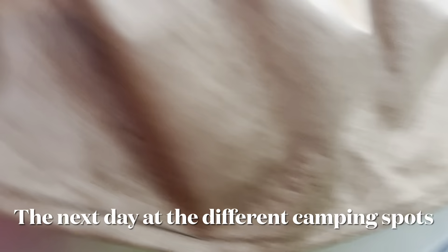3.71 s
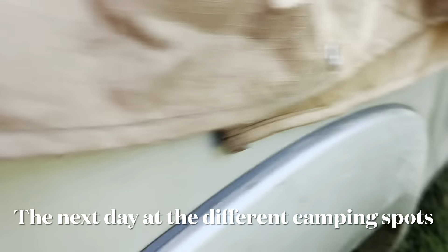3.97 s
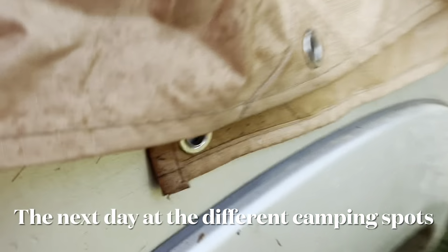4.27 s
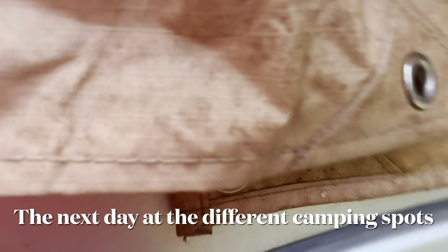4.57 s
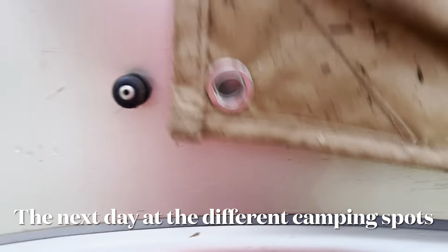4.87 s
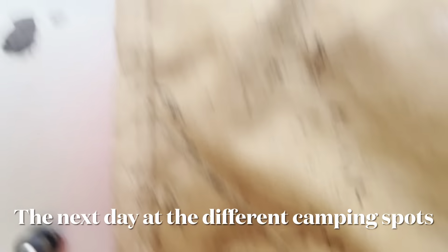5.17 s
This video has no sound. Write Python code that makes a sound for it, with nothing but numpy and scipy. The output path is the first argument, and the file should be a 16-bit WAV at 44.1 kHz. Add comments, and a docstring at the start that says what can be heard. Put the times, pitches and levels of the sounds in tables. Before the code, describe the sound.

Outdoors in quiet air, stiff canvas is handled very close to the microphone. Faint rustles and small bumps come first, followed by a single loud knock with a short, hollow rattle from a vehicle's body. The tarp then slides and bunches in repeated tugs, with scraping, dry crackles and low, billowing flaps. The last pulls are the loudest and busiest.

```python
"""Heavy canvas flaps and rustles right at the microphone: a tarp pulled back off a vehicle, outdoors.
The hollow body takes a few light bumps and one sharp, rattling knock. Then the cloth is dragged in
several pulls: its weave hisses and rasps as threads catch and slip, folds buckle and snap, and the
slack sheet pushes air in low flaps. Quiet open air lies underneath."""
import sys
import numpy as np
from scipy import signal
from scipy.fft import rfft, irfft
from scipy.io import wavfile
from scipy.ndimage import map_coordinates

SR = 44100
rng = np.random.default_rng(int(sys.argv[2]) if len(sys.argv) > 2 else 0)


def to_wav(s):
    """Save 16-bit WAV."""
    ch = np.atleast_2d(s).T  # columns
    pcm = np.round(np.clip(ch, -1, 1) * 32767)  # PCM
    wavfile.write(sys.argv[1], SR, pcm.astype(np.int16))


N = 235213
T = np.arange(N) / SR
FREQS = np.fft.rfftfreq(2 ** 18, 1 / SR)
PATHS = 3  # one direct path, then a scattered path to each of the two microphone ports


def cloth():
    """Threads catch and slip, small folds buckle and the sheet billows, all with one uneven drag."""
    # Cloth slides over cloth. Each row: time of full speed, rise, hold and fall in seconds,
    # then hiss and fine weave treble in dB.
    slides = [(0.0, .02, 0.0036, 0.042, -55.5, -57.5), (0.18, 0.0063, 0.004, 0.018, -58, -64),
              (0.21, 0.008, 0.004, 0.017, -61, -60), (0.19, 0.052, 0.042, .07, -59, -77),
              (0.30, 0.039, 0.041, 0.038, -58.5, -79), (0.44, 0.024, 0.021, 0.089, -57, -65.5),
              (0.463, .005, .003, 0.014, -54, -70), (0.602, 0.0099, 0.03, 0.025, -66, -65),
              (1.0, 0.25, 0.18, 0.17, -61, -99), (1.27, 0.2, 0.18, 0.14, -61.5, -66),
              (1.78, 0.017, 0.0058, 0.031, -66, -55), (1.90, 0.18, 0.087, 0.2, -54.5, -60.5),
              (2.13, 0.091, 0.0056, 0.045, -44.5, -50), (2.208, 0.025, 0.08, 0.17, -40.5, -39.5),
              (2.40, 0.075, 0.092, 0.17, -51, -78), (2.69, 0.15, 0.0093, 0.18, -39, -46),
              (2.79, 0.096, 0.064, 0.1, -48.5, -53), (2.912, 0.032, .008, 0.027, -46, -77),
              (3.15, 0.026, 0.075, 0.04, -47.5, -53.5), (3.253, 0.011, 0.011, 0.045, -41, -45),
              (3.29, 0.03, 0.022, 0.067, -37, -41.5), (3.42, .14, 0.038, 0.065, -41.5, -46),
              (3.475, 0.056, 0.03, 0.16, -37.5, -41), (3.59, 0.1025, 0.063, 0.074, -44.5, -48.5),
              (3.675, 0.038, .11, 0.09, -41.5, -38.5), (3.85, 0.17, 0.11, 0.4, -35.5, -41),
              (4.09, 0.12, 0.051, 0.11, -49, -58), (4.24, 0.078, 0.097, 0.087, -44, -44.5),
              (4.489, 0.015, 0.016, 0.15, -39, -43.5), (4.59, 0.045, 0.048, .1, -47.5, -51.5),
              (4.68, 0.022, 0.017, .04, -39, -45.5), (4.73, 0.033, 0.054, 0.26, -36, -38.5),
              (4.92, 0.12, 0.065, 0.24, -39.5, -41.5), (5.205, 0.06, 0.011, 0.21, -47.5, -45)]
    # Cloth bunches up. Each row: time it is fullest, rise, hold and fall in seconds,
    # then crumpling and billowing in dB.
    bunches = [(0.0, .02, 0.0052, 0.078, -53.5, -40.5), (0.125, 0.056, 0.039, 0.14, -58.5, -46),
               (0.26, 0.12, 0.09, 0.08, -53, -58), (0.52, 0.15, 0.0067, 0.088, -51.5, -52),
               (0.73, 0.036, 0.19, 0.13, -61, -54), (1.03, 0.05, 0.017, 0.078, -56.5, -54),
               (1.215, 0.038, 0.023, 0.032, -55, -75), (1.45, 0.019, 0.0042, 0.016, -52, -39.5),
               (1.93, 0.49, 0.29, 0.44, -46, -38), (2.43, 0.05, 0.23, 0.39, -46.5, -45.5),
               (2.69, 0.25, 0.027, 0.32, -41, -37), (3.05, 0.1, 0.12, 0.084, -58.5, -68),
               (3.21, 0.11, 0.059, 0.35, -45.5, -38.5), (3.45, 0.075, 0.3, 0.15, -43.5, -41.5),
               (3.81, 0.37, 0.1, 0.076, -39.5, -39.5), (3.91, 0.088, 0.081, 0.22, -31, -28.5),
               (4.10, 0.077, 0.043, 0.19, -33.5, -42), (4.23, 0.039, 0.041, 0.22, -38.5, -37.5),
               (4.495, 0.021, 0.0056, 0.13, -51, -30.5), (4.70, 0.09, 0.2, 0.12, -37, -33),
               (4.94, 0.18, 0.047, 0.15, -31, -28), (5.015, 0.049, 0.0084, 0.089, -28, -31.5),
               (5.12, 0.12, 0.011, 0.14, -37, -33.5), (5.27, 0.11, 0.011, 0.15, -41.5, -41.5)]
    # The tone of each layer. Each row: frequency in Hz, level in dB.
    hiss_tone = [(200, -10), (700, 1), (1500, 5.5), (2300, 3.5), (3400, 1.5), (4600, 2.5), (6000, -7),
                 (8000, -25), (15000, -18)]
    weave_tone = [(2000, -7.5), (5000, -0.5), (7500, 2.5), (10500, 3.5), (13000, -1), (15500, -2)]
    crumple_tone = [(60, -28.5), (200, 4), (380, 4.5), (600, 1), (830, -4), (1100, 0.5), (1450, 0),
                    (2100, -10.5), (3200, -21), (6000, -20.5), (15000, -23.5)]
    billow_tone = [(20, -32), (35, -6), (55, 2), (85, 1), (140, -3), (240, -7.5), (400, -14), (800, -24),
                   (3000, -64)]
    hiss_db, weave_db = move_levels(slides, fades_db=[19.5, 20])
    crumple_db, billow_db = move_levels(bunches, fades_db=[20, 22.5])
    jerk = walk(55) + 0.24 * walk(210)
    hiss = shifting_folds(colour(grains(6000, 0.84), hiss_tone), depth_db=1.5, rate=9)
    hiss *= amp(hiss_db + 2.5 + jerk)
    weave = shifting_folds(colour(grains(16000, 3.2), weave_tone), depth_db=-0.66, rate=11)
    weave *= amp(weave_db + 5 + 1.3 * jerk)
    crumple = shifting_folds(colour(grains(1300, 1.9), crumple_tone), depth_db=2.5, rate=30)
    crumple *= amp(crumple_db + 1 + 1.5 * jerk)
    crinkles = creases() * amp(crumple_db - 7)
    grit = unit(band(grains(220, 2.2), 1100, 5500)) * amp(hiss_db - 9.5)
    billow = unit(colour(grains(900, 1.3), billow_tone)) * amp(billow_db + 0.5 + jerk)
    rustle = hiss + weave + crumple
    # narrow pockets between the folds colour the whole rustle for a moment each
    rustle = rustle.std() * shifting_folds(rustle, depth_db=2.2, rate=16, per_octave=14)
    return ports(rustle + crinkles + grit + billow, scatter=0.74)


def move_levels(moves, fades_db, braking=1.18):
    """Two dB envelopes: moves swell, hold and die away, losing fades_db over one rise or fall time."""
    power = np.full((2, N), 1e-12)
    for s, rise, hold, fall, *db in moves:
        away = np.maximum(s - T, 0) / rise + np.maximum(T - s - hold, 0) / fall
        near = away < 3
        lost_db = np.outer(fades_db, away[near] ** braking)  # ever faster as friction stops the move
        power[:, near] += amp(np.array(db)[:, None] - lost_db) ** 2
    return 10 * np.log10(power)


def grains(rate, spread_db):
    """Random clicks, rate a second, mostly small and a few large."""
    chance, size = rng.random(N), np.minimum(rng.exponential(size=N), 4)
    return (chance < rate / SR) * rng.choice([-1, 1], (PATHS, N)) * amp(spread_db * size)


def shifting_folds(x, depth_db, rate, per_octave=2.518):
    """Folds open and close, so the cloth's resonances come and go, rate times a second."""
    hz, s, spectra = signal.stft(x, SR, nperseg=512)
    place = np.meshgrid(np.log2(1 + hz / 100) * per_octave, s * rate, indexing="ij")
    drift = map_coordinates(rng.standard_normal(size=(128, 512)), place, order=3, mode="wrap")
    return unit(signal.istft(spectra * amp(depth_db * drift), SR)[1][:, :N])


def creases(centre_hz=2100, octaves=0.6, range_db=13, count=900):
    """Small creases flip at random, each a dry tick with its own falling pitch."""
    out = np.zeros((PATHS, N))
    for when, pitch, size in zip(rng.random(count), rng.standard_normal(count), rng.random(count)):
        hz = min(centre_hz * 2 ** (octaves * pitch), SR / 4)
        add(out, when * N / SR, amp(range_db * size ** 2) * pop(hz, cycles=1.2, sag=0.16))
    return unit(out)


def rasps(roughness_hz=230, wobble=0.025):
    """The ribs of the weave rub past each other: a short rough zip, gliding up or down in pitch."""
    # Taut cloth rubs itself. Each row: start and length in seconds, first and last pitch in Hz,
    # level in dB.
    zips = [(0.191, .17, 820, 957, -52), (0.472, 0.151, 950, 856, -53.5), (2.201, 0.12, 2500, 2300, -49),
            (2.591, .2, 2210, 2500, -47), (3.402, 0.052, 2090, 2990, -42), (3.462, 0.1, 1550, 2840, -39),
            (3.479, .045, 4100, 4760, -39), (3.848, 0.032, 3400, 4480, -36.5),
            (4.511, .15, 1744, 2200, -45.5), (4.659, .13, 1820, 2415, -37.5),
            (4.736, .12, 2570, 2820, -38.5), (5.017, .045, 2310, 1796, -36)]
    out, t = np.zeros((PATHS, N)), T[:SR // 4]
    unsteady = 1 + wobble * walk(60)
    for s, length, start_hz, end_hz, db in zips:
        along = np.minimum(t / length, 1)
        pitch = (start_hz + (end_hz - start_hz) * along) * unsteady[int(s * SR):][:len(t)]
        tone = np.sin(2 * np.pi * np.cumsum(pitch) / SR)
        roughness = unit(band(rng.standard_normal((PATHS, len(t))), 6.7, roughness_hz))
        add(out, s, amp(db) * np.sin(np.pi * along) * unit(roughness * tone))
    return ports(out, scatter=0.61)


def snaps(pop_db=-2.5, rasp_db=-6, crackle_db=9):
    """A taut fold pops through with a falling chirp; the sheet around it thuds and its fibres crackle."""
    # Folds that snap. Each row: start in seconds, level in dB, starting pitch in Hz, pitch sag as a
    # share per cycle, fibre crackle in dB, decay in seconds, thud in dB.
    folds = [(0.291, -42, 1010, 0.046, -51, 0.0074, -55), (0.725, -35.5, 970, .017, -65, 0.014, -52),
             (0.828, -41, 1120, .2, -72, 0.0019, -46), (1.277, -37.5, 3640, .009, -57, .0028, -53),
             (1.922, -25.5, 2480, 0.054, -55, 0.0034, -38), (1.974, -26.5, 2270, 0.11, -42, 0.0066, -26.5),
             (1.998, -30, 895, .36, -55, 0.0022, -25), (2.033, -30, 1100, 0.21, -61, 0.0026, -32),
             (2.040, -39, 700, 0.33, -62, 0.0023, -34), (2.056, -33, 1200, 0.078, -61, 0.002, -35),
             (2.179, -31, 695, 0.35, -58, 0.0059, -34), (2.210, -22, 2580, 0.1, -29, 0.0044, -27),
             (2.283, -17.5, 2410, 0.0052, -31.5, 0.0081, -42), (2.437, -30, 1510, 0.019, -60, .004, -35),
             (2.510, -34, 1310, 0.2, -51, 0.0022, -32), (2.538, -33, 1510, 0.23, -39.5, 0.0023, -34),
             (3.200, -29, 1150, .15, -51, 0.0039, -32), (3.223, -20.5, 1530, 0.34, -46, 0.0041, -22.5),
             (3.268, -35, 2240, 0.016, -40, .0041, -44), (3.281, -24, 2480, .007, -35, 0.0016, -36),
             (3.4318, -16.5, 1100, .01, -47, 0.0026, -40), (3.449, -27, 1300, .04, -46, 0.0021, -42),
             (3.477, -28, 1200, .013, -44, .004, -40), (3.6099, -14, 2500, .22, -49, 0.004, -20.5),
             (3.739, -14, 2210, 0.04, -22.5, 0.0016, -32), (3.787, -25, 1000, .01, -48, .003, -28),
             (3.813, -20, 1040, 0.095, -31.5, 0.0033, -29), (3.916, -25, 1800, 0.35, -42, .002, -17.5),
             (3.947, -17, 1280, 0.13, -45, 0.0026, -20), (3.955, -20, 1400, .05, -44, 0.0024, -24),
             (3.972, -16, 1110, 0.1, -46, 0.0035, -15), (3.993, -24, 1720, 0.072, -37, .0018, -26),
             (4.001, -23, 1600, 0.13, -33, .002, -25), (4.043, -21, 1200, 0.32, -44, 0.0023, -18.5),
             (4.075, -16, 1500, 0.3, -23.5, 0.0024, -26), (4.107, -18, 2310, 0.57, -50, 0.0026, -26),
             (4.126, -29, 1270, 0.017, -54, 0.0034, -36), (4.153, -27, 2390, .01, -38, .0015, -36),
             (4.189, -23.5, 1495, .005, -49, 0.0034, -44), (4.5075, -12.5, 2210, 0.34, -48, 0.0041, -15),
             (4.725, -36, 1890, 0.37, -33, 0.0036, -22), (4.799, -16, 1520, 0.15, -45, .003, -21),
             (4.825, -22, 2265, .052, -47, 0.0022, -20), (4.8898, -24, 1112, 0.16, -52, 0.008, -15.5),
             (4.901, -20, 1300, 0.045, -31.5, 0.0033, -27), (4.920, -17, 1600, 0.22, -42, .002, -25),
             (4.936, -17.5, 2100, 0.12, -40, 0.004, -19.5), (4.941, -22, 2470, 0.034, -45, 0.0041, -29),
             (4.951, -20, 1300, 0.23, -43, .002, -19), (4.966, -24, 1900, 0.1, -45, 0.0022, -31),
             (4.974, -33, 990, 0.42, -46, 0.0018, -24), (5.0042, -21, 1250, 0.025, -56, .0043, -31),
             (5.01, -25, 1500, 0.16, -46, 0.0022, -22), (5.016, -14, 1860, 0.089, -51, 0.0027, -16),
             (5.0234, -13, 2000, 0.17, -46, .0018, -18.5), (5.039, -16.5, 1520, 0.064, -50, 0.0024, -23),
             (5.112, -14, 1730, 0.11, -46, 0.0029, -21)]
    out = np.zeros((PATHS, N))
    for s, db, hz, sag, fibre_db, decay, thud_db in folds:
        chirp = amp(db + pop_db) * pop(hz, min(hz * decay, 10), sag)
        rasp = amp(db + rasp_db) * burst(hz * 0.48, hz + 1500, decay)
        thud = amp(thud_db) * burst(143, 520, decay=0.0036)
        crackle = amp(fibre_db + crackle_db) * burst(1830, 4420, decay * 1.17)
        add(out, s, chirp + rasp + thud + crackle)
    return ports(out, scatter=0.99, pan_db=0.5)


def pop(hz, cycles, sag=0.):
    """A patch of cloth or panel jumps to a new shape and swings briefly; sag slows it as it slackens."""
    age = T[:SR // 25] * hz
    turns = np.cumsum(hz / (1 + sag * age)) / SR
    phase = rng.uniform(0, 2 * np.pi, (PATHS, 1))
    phase[0] = 0  # only the scattered paths start at random
    swing = np.sin(2 * np.pi * turns + phase) * np.exp(-age / cycles) * (1 - np.exp(-2 * np.pi * age))
    return swing / abs(swing[0]).max()


def burst(lo_hz, hi_hz, decay):
    """A dying burst of noise in one band, with a peak of 1."""
    t = T[:SR // 25]
    noise = band(rng.standard_normal((PATHS, len(t))) * np.exp(-t / decay), lo_hz, hi_hz)
    return noise / abs(noise).max(axis=1, keepdims=True)


def flaps(sag=0.089):
    """The sheet pushes air for a few cycles; its pitch sags as it goes slack."""
    # Each row: start in seconds, level in dB, pitch at the peak in Hz, swings until the peak.
    sheet_flaps = [(0.0, -25, 48.6, 0.9), (0.04, -34, 46.3, 1.36), (0.114, -41, 99, 4),
                   (0.828, -33.5, 77.6, 0.86), (0.898, -38.5, 70.7, 1.15), (1.446, -45, 111, 1.8),
                   (1.876, -32, 124, 1.1), (1.962, -24, 86.3, 1.37), (2.062, -19.5, 129, 1.3),
                   (2.205, -24, 85.4, 1.4), (2.214, -24.5, 221, 0.9), (2.555, -25, 64, 1.07),
                   (2.693, -26.5, 60.3, 1.6), (3.226, -28.5, 85, 0.73), (4.037, -22.5, 146, 0.75),
                   (4.239, -28, 61, 1.4), (4.494, -25.5, 70, 1.06)]
    out, t = np.zeros((PATHS, N)), T[:SR // 4]
    for s, db, hz, swell in sheet_flaps:
        age = t * hz / swell
        turns = np.cumsum(hz * (1 + sag * (1 - np.minimum(age, 3)))) / SR
        envelope = (age * np.exp(1 - age)) ** 2
        add(out[0], s, amp(db) * envelope * np.sin(2 * np.pi * turns))
    return ports(out, scatter=0.94)


def knocks():
    """Each blow flexes the struck spot and rings the hollow body; a longer contact makes it duller."""
    # Each row: start in seconds, strength in dB, contact time in seconds, pitch of the struck spot
    # in Hz, its flexing in dB relative to the blow, its decay in cycles.
    blows = [(0.309, -23.5, 0.0039, 238, -13, 5.4), (0.520, -25, 0.0036, 282, -10, 6),
             (0.83, -40, 0.0011, 552, 7, 5.6), (1.5236, 1.5, 0.00042, 572, -4.5, 3.7),
             (1.5405, -9, 0.00048, 183, -0.5, 0.28), (1.561, -13, 0.0023, 660, -1, 2.5),
             (1.578, -14, 0.0041, 690, 0, 7.9), (5.131, -28, 0.003, 351, 9, 3.8)]
    # How the body's sound meets the ports. Each row: frequency in Hz, left port's lead in radians.
    body_phase = [(0, 0), (1550, 3.5), (2070, -0.5), (2840, 1.7), (4650, -0.0), (5430, 2.7), (5770, 5.5),
                  (6550, 4.9), (7750, 3.5), (9470, 2.4), (11000, 0.3), (13000, -0.3), (13500, -1.7),
                  (15200, -3.3)]
    out, response = np.zeros((PATHS, N)), hollow_body()
    for s, db, contact, hz, flex_db, cycles in blows:
        softness = np.exp(-2 * np.pi / (contact * SR))
        add(out, s, amp(db) * signal.lfilter([1 - softness], [1, -softness], response))
        add(out, s, amp(db + flex_db) * pop(hz, cycles))
    return ports(out, scatter=1, phase=body_phase)


def hollow_body(modes_db=-16, clatter_db=-21, crack_db=-4, crack_s=0.0041, spread_s=0.005):
    """One hard blow cracks, then spreads through the body as ringing modes and a dense clatter."""
    # Ringing modes, then clatter bands. Each row: frequency in Hz, level in dB, seconds to fall 60 dB.
    body_modes = [(74.7, -12.2, 1.16), (94.9, -14.2, 0.94), (109.7, -10.3, 0.82), (146.0, -12.7, 0.64),
                  (179.0, -7, 0.48), (194.5, -3.5, 0.45), (212.6, 0.0, 0.47), (238.9, -5.5, 0.46),
                  (276.6, -3.6, 0.44), (312.2, -4, 0.43), (338.5, -12.8, 0.42), (350.6, -12.9, 0.42),
                  (391.0, -11.7, 0.41), (407.1, -5.5, 0.4), (437.4, -9.2, 0.39), (479.8, -7.9, 0.39),
                  (500.6, -5.9, 0.38), (562.6, -2.0, 0.37), (604.9, -7.5, 0.36), (625.1, -5.7, 0.36),
                  (647.3, -11.2, 0.36), (662.8, -2.9, 0.36), (732.1, -9.7, 0.35), (802.8, -14, 0.34)]
    clatter_bands = [(44.6, -19, 0.95), (110, -14.5, 0.93), (210, -6, 0.77), (400, -11.5, 0.79),
                     (684, -4, 0.41), (1200, -10.5, 0.38), (2340, -14, 0.33), (3740, -13.5, 0.29),
                     (6470, -16.5, 0.26), (12000, -12.5, 0.19)]
    # The tone of the impact. Each row: frequency in Hz, level in dB.
    crack_tone = [(100, -27), (350, -5.5), (570, 11.5), (900, -11.5), (1400, -19), (2100, -14), (4000, -17),
                  (6000, -20.5), (11000, -14), (16000, -26)]
    t, attack = T[:SR], slice(SR // 20)
    phases = rng.uniform(0, 2 * np.pi, (len(body_modes), PATHS, 1))
    phases[:, 0] = 0
    modes, clatter = np.zeros((2, PATHS, SR))
    for k, (hz, db, t60) in enumerate(body_modes):
        modes += (-1) ** k * amp(db - 60 * t / t60) * np.sin(2 * np.pi * hz * t + phases[k])
    for hz, db, t60 in clatter_bands:
        noise = band(rng.standard_normal((PATHS, SR)), hz / 1.43, hz * 1.34, order=3)
        clatter += amp(db - 60 * t / t60) * unit(noise)
    impact = rng.standard_normal((PATHS, SR)) * np.sqrt(t) * np.exp(-t / crack_s)
    crack = colour(impact, crack_tone)[:, :SR]
    ring = amp(modes_db) * modes / modes[:, attack].std()
    ring += amp(clatter_db) * clatter / clatter[:, attack].std()
    response = ring * (1 - np.exp(-t / spread_s)) + amp(crack_db) * crack / abs(crack).max()
    # high bending waves arrive first: a short falling chirp
    add(response, 0, amp(-17) * pop(4500, cycles=18, sag=0.075))
    return response


def outdoors(level_db=-58.5):
    """Quiet open air, gently swelling and sinking."""
    # The tone of the air. Each row: frequency in Hz, level in dB.
    air_tone = [(20, -21), (55, -1.5), (120, -12), (250, -9.5), (600, -8.5), (1500, -17), (4000, -19),
                (8000, -28), (15000, -31)]
    air = unit(colour(rng.standard_normal((PATHS, N)), air_tone))
    return ports(air * amp(level_db + walk(3.83)), scatter=0.98)


def ports(x, scatter, pan_db=0., phase=None):
    """Two microphone ports hear the direct sound out of step, and each its own scattered sound."""
    # Each row: frequency in Hz, left port's lead in radians.
    port_phase = [(0, 0), (1120, 1.7), (1550, 2.8), (2070, -0.3), (2930, 1.0), (4820, 0.3), (5510, -0.9),
                  (6980, -1.5), (7670, -2.9), (8870, -3.4), (11100, -6.0), (13000, -6.7), (14600, -9.0),
                  (15200, -9.5)]
    # Each row: frequency in Hz, scattered share of the power from 0 to 1.
    scattered_share = [(60, 0.078), (300, 0.12), (650, 0.17), (1200, 0.93), (2300, 0.18), (3400, 1),
                       (5400, 0.78), (7200, 0.015), (8300, 0.0014), (9700, 0.067), (11800, 0.031),
                       (14000, 0.03)]
    # Each row: frequency in Hz, left minus right in dB.
    port_balance = [(60, 1.6), (200, 1.5), (600, 4), (1200, 0.5), (2300, 1.5), (4400, 1.5), (7500, 7),
                    (15000, -1.5)]
    share = np.clip(across(scattered_share) * scatter, 0, 1)
    sides = np.array([[1], [-1]])
    balance = amp(sides * (across(port_balance) + pan_db) / 2)
    lead = np.interp(FREQS, *np.transpose(port_phase if phase is None else phase))
    direct = filtered(x[0], balance * np.sqrt(1 - share) * np.exp(.5j * sides * lead))
    return direct + filtered(x[1:], balance * np.sqrt(share))


def amp(db):
    """Decibels to gain."""
    return 10 ** (np.asarray(db) / 20)


def across(points):
    """(Hz, value) points joined on a log-frequency axis."""
    hz, value = np.transpose(points)
    return np.interp(np.log(FREQS + 1), np.log(hz), value)


def filtered(x, response):
    """Apply a frequency response."""
    return irfft(rfft(x, 2 * len(FREQS) - 2) * response)[..., :N]


def colour(x, points):
    """Minimum-phase EQ through the given (Hz, dB) points."""
    cepstrum = irfft(np.log(amp(across(points))))
    cepstrum[1:len(FREQS) - 1] *= 2
    cepstrum[len(FREQS):] = 0
    return filtered(x, np.exp(rfft(cepstrum)))


def band(x, lo_hz, hi_hz, order=2):
    """Butterworth band-pass."""
    edges = [lo_hz, min(hi_hz, SR / 2 - 1)]
    return signal.sosfilt(signal.butter(order, edges, "band", fs=SR, output="sos"), x)


def unit(x):
    """Scale to rms 1."""
    return x / np.sqrt(np.mean(x ** 2))


def add(track, s, sound):
    """Mix a sound in at s seconds."""
    start = max(int(s * SR), 0)
    track[..., start:start + sound.shape[-1]] += sound[..., :N - start]


def walk(rate):
    """Random drift of rms 1, changing rate times a second."""
    return unit(np.interp(T * rate, np.arange(N), rng.standard_normal(N)))


def scene():
    """The tarp and the vehicle's body in the open air."""
    return cloth() + rasps() + snaps() + flaps() + knocks() + outdoors()


def record(dry, low_hz=27, top_hz=15300, drive=0.8):
    """The recorder drops the deepest rumble, rounds the loudest peaks and cuts the top."""
    lean = signal.sosfilt(signal.butter(2, low_hz, "high", fs=SR, output="sos"), dry)
    rounded = np.tanh(drive * lean) / drive
    return signal.sosfilt(signal.ellip(10, .2, 70, top_hz, fs=SR, output="sos"), rounded)


dry = scene()
out = record(dry)
to_wav(out)
```